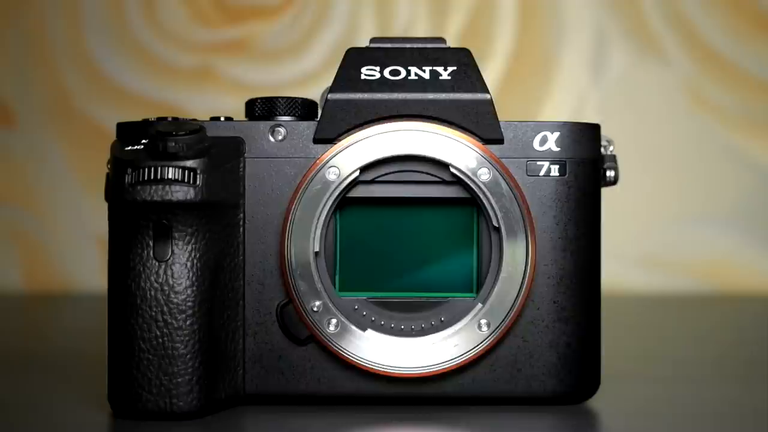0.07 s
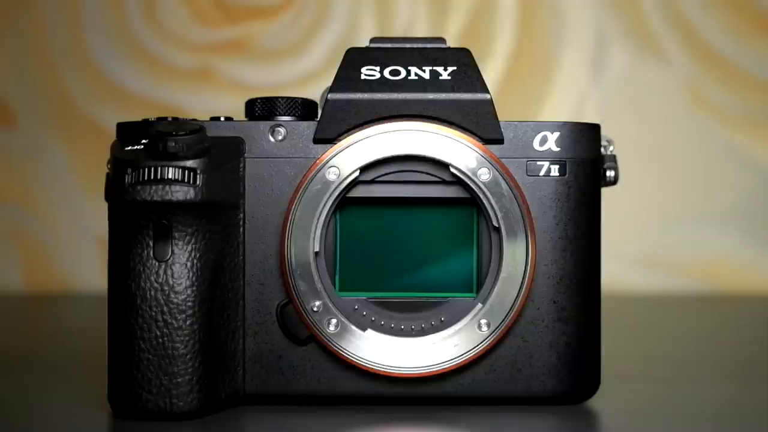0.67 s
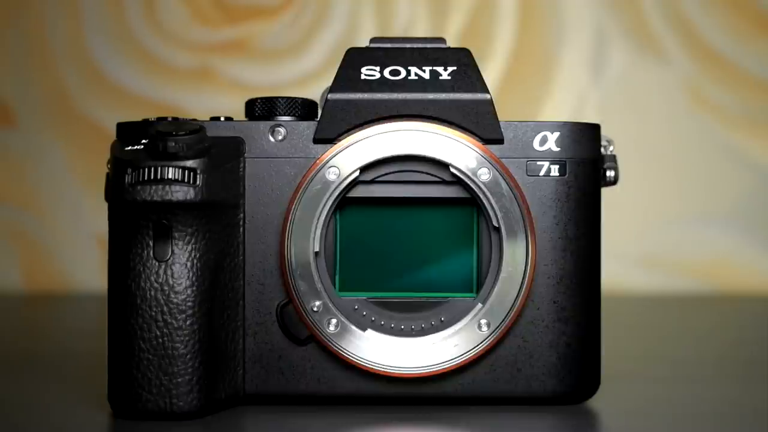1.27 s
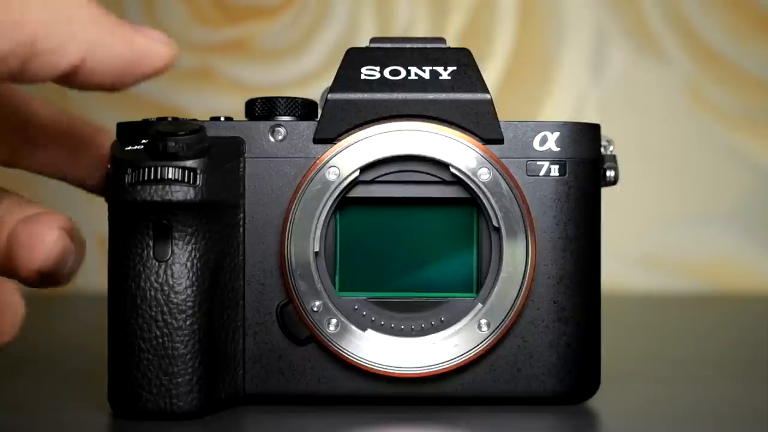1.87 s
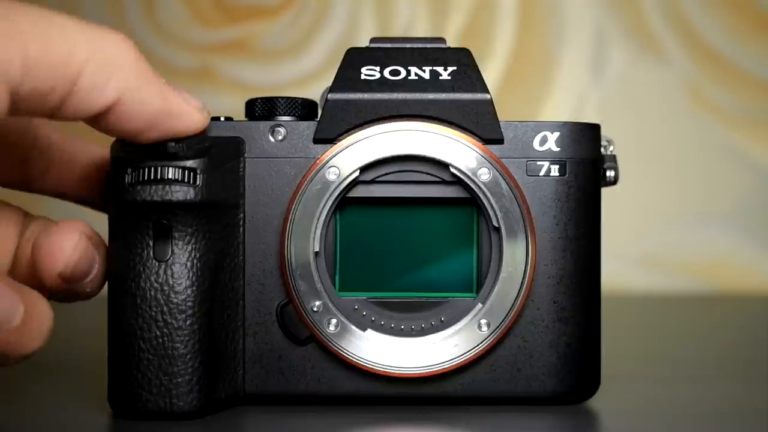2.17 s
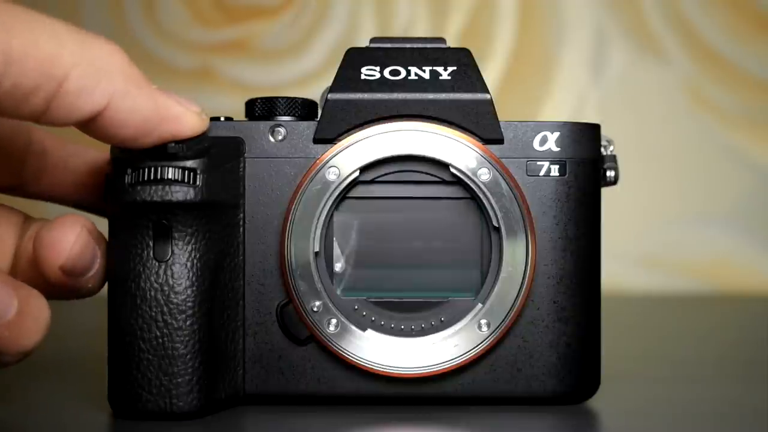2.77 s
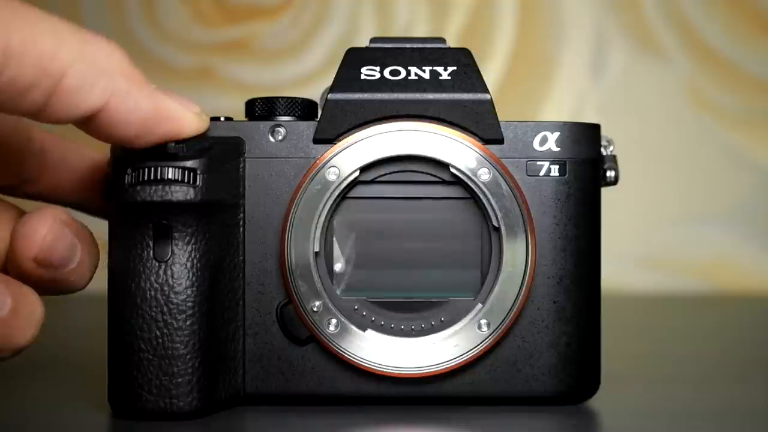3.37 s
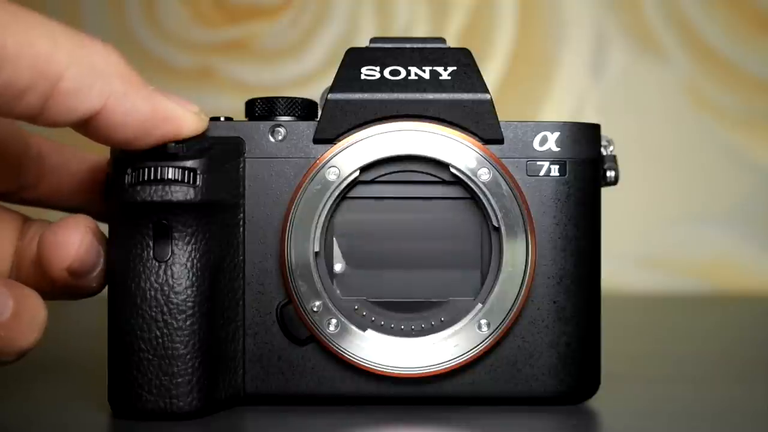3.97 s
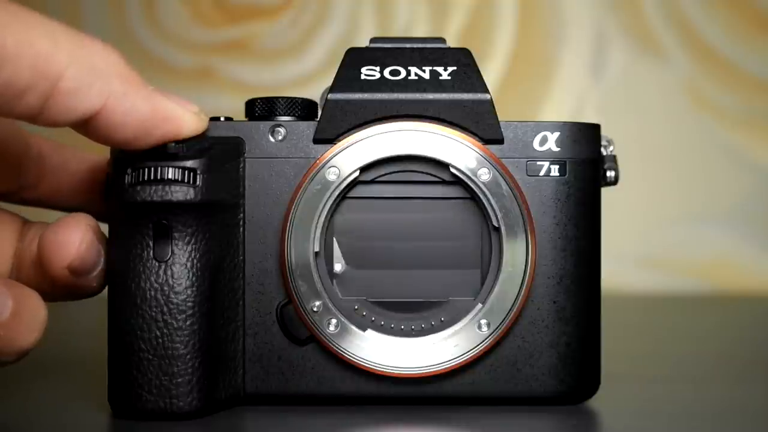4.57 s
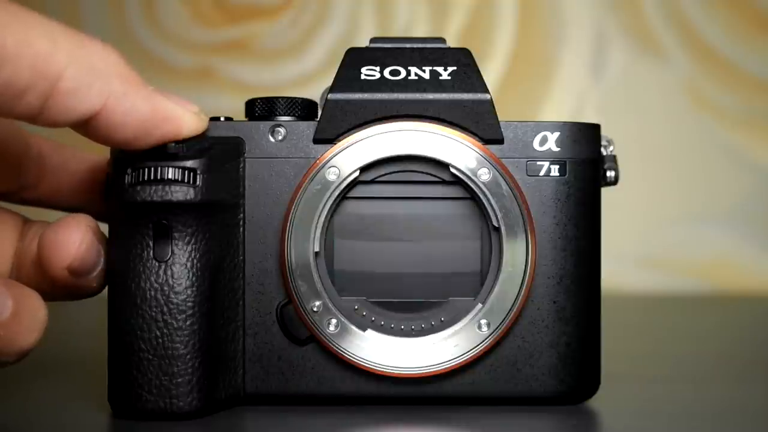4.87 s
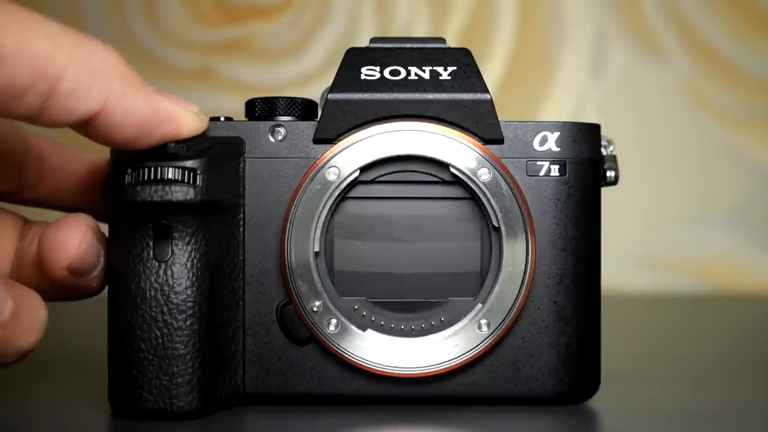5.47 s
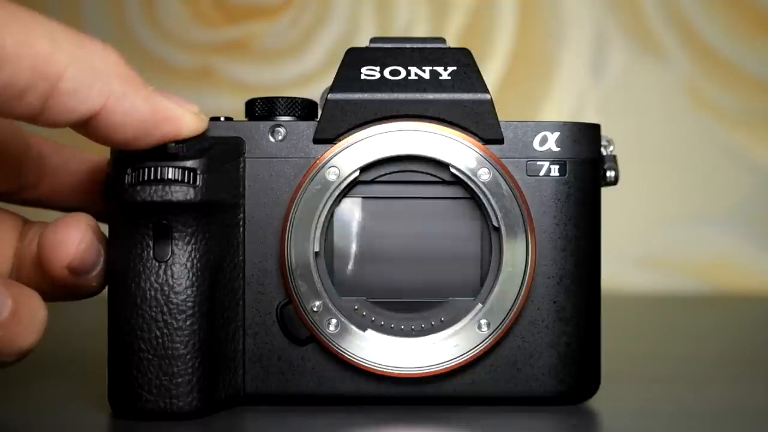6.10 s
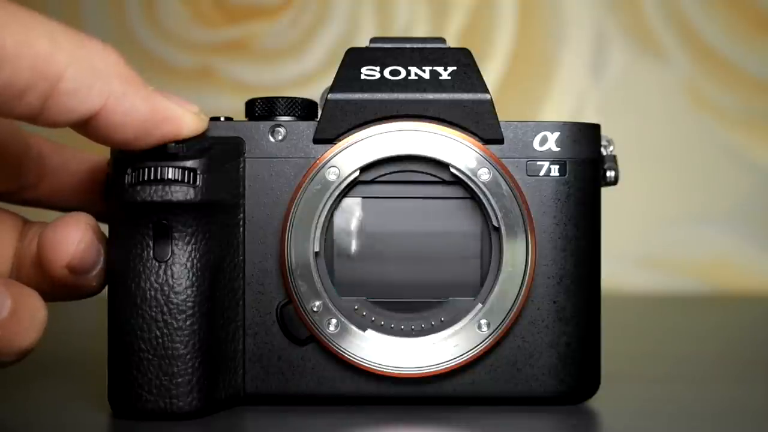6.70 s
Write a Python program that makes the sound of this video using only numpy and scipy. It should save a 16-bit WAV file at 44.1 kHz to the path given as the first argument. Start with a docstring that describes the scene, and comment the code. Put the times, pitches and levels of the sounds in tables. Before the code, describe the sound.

A camera's mechanical shutter clacks in a rapid, even burst, with a small motor whirring between the sharp clicks.

```python
"""A mirrorless camera with no lens stands on a table in a quiet, faintly humming room.
At about 2 s a finger settles on the button; then the camera fires a burst, five frames a second.
In each cycle a motor cocks the springs, one curtain snaps open, the other slams shut and the blades
swing back, all ringing through the camera and table. The microphone is close: its two sides hear
different tone colours, and the slams overload it. The burst runs on to the end."""
import sys
import numpy as np
from scipy import signal
from scipy.fft import rfft, irfft
from scipy.io import wavfile
from scipy.ndimage import uniform_filter1d

SR = 44100
rng = np.random.default_rng(int(sys.argv[2]) if len(sys.argv) > 2 else 0)


def transcribe(u):
    """Save the signal u as a 16-bit wav file named by the first command-line argument.

    u: samples, shape (n,) or (channels, n), limited to [-1, 1]; the rate is SR.
    q: integer samples, one column per channel.
    """
    v = np.clip(np.atleast_2d(u).T, -1, 1)
    q = np.round(v * 32767).astype(np.int16)
    wavfile.write(sys.argv[1], SR, q)


N = 297234
TIME = np.arange(N) / SR
MOTOR_START_S, CYCLE_S = 2.347, .201

# each slam, and the thump of the overloaded microphone: start_s, overload_db (before thump_boost_db)
SLAMS = [(2.5376, -62), (2.7393, -57), (2.9398, -63), (3.1401, -65), (3.3404, -49), (3.5428, -49),
         (3.7439, -66), (3.9449, -59), (4.1461, -49), (4.3471, -48), (4.5475, -57), (4.7489, -64),
         (4.9508, -62), (5.1545, -47), (5.3554, -55), (5.5566, -45), (5.758, -66), (5.9594, -47),
         (6.161, -56), (6.3625, -66), (6.5644, -60)]
# the first hit and its bounces: after_slam_ms, level_db
BOUNCES = [(.05, 2.5), (.32, -3), (0.521, -13)]
# tone colour of the click: pitch_hz, gain_db
CLICK_COLOUR = [(30, 3), (250, 2), (600, 0.5), (1000, 14), (1600, 17.5), (2700, 14), (4000, 6.5),
                (6000, 12.5), (9000, 16), (14000, 10)]


def curtain_slam(side_db=-8, side_lag_ms=0.12, vary_db=0.56, thump_boost_db=72):
    """The closing curtain stops dead with a hard, bouncing click; the overloaded microphone adds
    a low thump of varying strength. Gives mid and side."""
    clicks, thumps = np.zeros((2, N + SR))
    start_s, overload_db = np.transpose(SLAMS)
    for ms, db in BOUNCES:
        at = (start_s * SR + .5).astype(int) + round(ms / 1000 * SR)
        clicks[at] += from_db(db + vary_db * rng.standard_normal(len(at)))
    thumps[at] = from_db(overload_db + thump_boost_db)
    click = colour(clicks[:N], CLICK_COLOUR)
    thump = colour(thumps[:N], [(25, 5.0), (70, -2.0), (150, -18.0), (600, -53.0)])
    side = from_db(side_db) * np.interp(TIME - side_lag_ms / 1000, TIME, click)
    return np.array([click + thump, side])


# slam times, plus one cycle at each end because the burst begins and ends in mid-cycle
CYCLE_TIMES_S = [SLAMS[0][0] - CYCLE_S] + [s for s, _ in SLAMS] + [SLAMS[-1][0] + CYCLE_S]
# Parts that meet in each cycle: cocking lever, spring cam, catch, first latch, opening curtain (lands,
# rebounds, flutters), second latch, closing curtain (flutters), blades (swing back, settle).
# after_slam_ms (negative is before), rise_ms, decay_ms, thud_db, knock_db, ring_db, tick_db
CONTACTS = [ (-113.2, 0.23, 0.97, 1.5, 1, -6, -14), (-104.2, 2.9, 4.9, 2, 6.5, 4, -5),
            (-72.5, 1.4, 1.9, -9.5, -0.5, -12, -17), (-45.5, 0.45, 3.2, -2, -9, 0.5, -57),
            (-38.5, 0.82, 0.87, 8.5, -1.5, 5, 11), (-36.5, 0.6, 1.8, 2.5, -3, 9, -9),
            (-31, 5.6, 7.7, 6, -2.5, 1.5, 6), (-6, 0.17, 2.8, 1, 4, 1, -8),
            (1.14, 1.2, 1.9, -2, 2, 1.5, 5.5), (17.5, 0.23, 1.6, 1.5, 11.5, 5, 7.5),
            (20, 0.82, 2.44, -0.5, 8, -2, -1)]
# where the thud, knock, ring and tick lie: pitch_hz
CONTACT_BANDS = [640, 1100, 4000, 8500]


def contact(after_slam_ms, rise_ms, decay_ms, bands_db, sameness=.85, jitter_ms=.1, vary_db=.5):
    """Two parts knock together in nearly the same way in every cycle. Gives mid and side."""
    lead, length = 1024, 4096   # samples
    ms = (np.arange(length) - lead) / SR * 1000
    envelope = np.exp(np.minimum(ms / rise_ms, -ms / decay_ms))
    usual = chatter(envelope)
    out = np.zeros((2, N + SR))
    for cycle_s, (late, force) in zip(CYCLE_TIMES_S, rng.standard_normal((len(CYCLE_TIMES_S), 2))):
        hit_s = cycle_s + (after_slam_ms + jitter_ms * late) / 1000
        burst = np.sqrt(sameness) * usual + np.sqrt(1 - sameness) * chatter(envelope)
        if hit_s > MOTOR_START_S:
            at = round(hit_s * SR) - lead
            out[:, at:at + length] += from_db(vary_db * force) * burst
    return colour(out[:, :N], list(zip(CONTACT_BANDS, bands_db)))


def chatter(envelope):
    """Tiny impacts blur into two bursts of noise, evened out from bass to treble."""
    spectra = rfft(rng.standard_normal((2, len(envelope))) * envelope)
    power = uniform_filter1d(np.abs(spectra) ** 2, size=61, axis=-1)
    return irfft(spectra / np.sqrt(power + 1e-20))


# one whir for each load the motor takes up: after_slam_ms, length_ms, start_pitch_hz, level_db
WHIRS = [(-146, 38, 402, -39.5), (-88, 47, 338, -40.5), (-38, 28.6, 332, -38), (-12, 63.6, 242, -38)]


def motor(sag_hz_per_s=400, wobble_share=0.01698, spin_up_s=0.0095):
    """The motor whirs, slowing under each load, and drives the shaft and gears. Gives mid and side."""
    wobble = wobble_share * wander(900)
    uneven_teeth = wander(50)
    tones = glides(WHIRS, -sag_hz_per_s, wobble) + shaft_drone(wobble) + gear_whistle(uneven_teeth)
    running = np.clip((TIME - MOTOR_START_S) / spin_up_s, 0, 1)
    return (gear_rustle(uneven_teeth) + np.array([tones, np.zeros(N)])) * running


# swells of the shaft's drone: after_slam_ms, length_ms, level_db
DRONES = [(-47, 44, -46), (20, 59, -46.5)]


def shaft_drone(wobble, pitch_hz=139.7, octave_db=-3, idle_db=-57):
    """The spinning shaft drones, louder after each curtain has moved."""
    angle = phase(pitch_hz * (1 + 2 * wobble))
    effort = from_db(idle_db) + sum(from_db(db) * swell(ms, length_ms) for ms, length_ms, db in DRONES)
    return effort * (np.sin(angle) + from_db(octave_db) * np.sin(2 * angle))


# chirps of the gears: after_slam_ms, length_ms, start_pitch_hz, level_db
CHIRPS = [(-150, 46, 4700, -53), (-96, 18, 8750, -49), (-73, 24, 8750, -44), (-72, 18, 5950, -54)]


def gear_whistle(uneven_teeth, rise_hz_per_s=10000, flutter_share=0.0061):
    """Gear teeth whistle in short, rising chirps."""
    return glides(CHIRPS, rise_hz_per_s, flutter_share * uneven_teeth)


# tone colour of the rustle: pitch_hz, gain_db
RUSTLE_COLOUR = [(60, 10), (140, 9.5), (300, 20), (600, 8), (900, 8.5), (2500, 7), (4000, 6.5), (9000, 9.5),
                 (15000, 10)]


def gear_rustle(uneven_teeth, grain=0.24, base_db=-43.5, swing_db=1, peak_ms=-79):
    """Uneven teeth make a grainy rustle, loudest while the springs are cocked."""
    level_db = base_db + swing_db * np.cos(2 * np.pi * seconds_since(peak_ms) / CYCLE_S)
    grains = unit_level(np.exp(grain * uneven_teeth) * rng.standard_normal((2, N)))
    return from_db(level_db) * colour(grains, RUSTLE_COLOUR)


# the finger settles on the button: start_s, level_db
TOUCHES = [(1.976, -28), (2.012, -29)]


def finger(decay_s=0.0023):
    """Skin on the button makes faint, dull ticks. Gives mid and side."""
    envelope = sum(from_db(db) * (TIME > s) * np.exp(-np.abs(TIME - s) / decay_s) for s, db in TOUCHES)
    ticks = envelope * rng.standard_normal((2, N))
    return colour(ticks, [(500, -24), (2000, -21), (3300, -20.5), (6000, -36)])


# notes at which the camera and table ring: pitch_hz, width_hz (narrow rings longer), level_db
RESONANCES = [(139, 12, 3), (225, 22, 0), (277, 14, -3), (331, 16, 0), (470, 40, -6), (605, 25, 0),
              (649, 20, 3), (2287, 35, -7), (2638, 40, -8), (3606, 60, -9), (3772, 70, -8), (3993, 50, -7),
              (4307, 45, -10), (6574, 30, -7), (7093, 35, -6), (7350, 35, -7), (8950, 90, -8)]


def body_ring(x):
    """Every knock sets the camera and the table under it ringing."""
    out = x.copy()
    for hz, width_hz, db in RESONANCES:
        fade = np.exp(-np.pi * width_hz / SR)   # share of the ring left after one sample
        feedback = [1, -2 * fade * np.cos(2 * np.pi * hz / SR), fade ** 2]
        ring = signal.lfilter([1, 0, -1], feedback, x + 1e-18)
        out += from_db(db) * (1 - fade ** 2) / 2 * ring
    return out


def room_echo(x, fade_60_db_s=0.17, echo_db=-14, gap_s=0.0017, bass_db=-7):
    """Nearby walls add a short, blurred echo that is weak in the bass."""
    t = TIME[:SR // 2]
    tails = stereo(*rng.standard_normal((2, len(t)))) * from_db(-60 * t / fade_60_db_s) * (t > gap_s)
    tails /= np.sqrt(np.sum(tails ** 2, axis=1, keepdims=True))
    tails = colour(tails, [(350, bass_db), (1500, 0)])
    return x + from_db(echo_db) * signal.fftconvolve(x, tails, axes=1)[:, :N]


# the camera's tone colour at each side of the microphone: pitch_hz, gain_db
LEFT_COLOUR = [(30, -13), (80, -10), (140, -4.5), (420, -2), (620, -0.5), (820, -2.5), (1400, 0),
               (2900, -0.5), (3800, 7.5), (4500, 7.5), (5200, -6), (6200, -4.5), (7500, -20), (9000, -25.5),
               (11000, -26.5), (15000, -16)]
RIGHT_COLOUR = [(30, -28), (80, -8.5), (140, -4.5), (420, -2), (620, 0), (820, -1), (1400, -1),
                (2900, -0.5), (4000, -4.5), (4900, -5.5), (5700, -0.5), (7200, 2), (9000, 2.5), (11000, -5),
                (13000, -7.5), (15000, -20)]


def microphone(left, right):
    """This close to the camera, each side hears its own tone colour."""
    return np.array([colour(left, LEFT_COLOUR), colour(right, RIGHT_COLOUR)])


# tone colour of the room noise: pitch_hz, gain_db
AIR_COLOUR = [(25, -23), (62, -4.5), (100, -24), (135, -8), (180, -13), (235, -3), (320, -12), (700, -14.5),
              (1300, -21.5), (2800, -24.5), (4000, -22), (5500, -29.5), (11000, -32), (15000, -23)]
# tones in the room: pitch_hz, level_db (before hum_boost_db and the sinking)
HUMS = [(59.2, -90), (145.3, -84), (242.2, -75.5), (570.6, -82), (1007, -74.5)]


def background(air_db=-59, air_sink_db_per_s=3.5, hum_boost_db=4.5, hum_sink_db_per_s=3.0):
    """Soft room noise and a few humming tones come in quickly, then slowly sink away."""
    air = unit_level(colour(stereo(*rng.standard_normal((2, N))), AIR_COLOUR))
    air *= from_db(air_db - air_sink_db_per_s * TIME)
    hum = sum(from_db(db) * np.sqrt(2) * np.sin(2 * np.pi * (hz * TIME + rng.random())) for hz, db in HUMS)
    hum *= from_db(hum_boost_db - hum_sink_db_per_s * TIME)
    fade_in = np.clip((TIME - 0.033) / .03, .02, 1)
    return (air + hum) * fade_in


# stereo width, as the gain of the side signal: pitch_hz, gain_db
WIDTH = [(50, -3.5), (130, -15), (500, -9), (2000, -6.5), (4000, -2), (9000, -3.5)]


def stereo(mid, side):
    """Make left and right from mid (what they share) and side (how they differ)."""
    side = colour(side, WIDTH)
    return np.array([mid + side, mid - side])


def colour(x, points, size=8192):
    """Turn pitches up or down along a curve of (pitch_hz, gain_db) points."""
    hz, db = np.transpose(points)
    grid_hz = np.arange(size // 2 + 1) * SR / size
    gain = from_db(np.interp(np.log(grid_hz + 1), np.log(hz), db))
    # minimum phase: the filter never sounds before the hit
    cepstrum = irfft(np.log(gain))
    cepstrum[1:size // 2] *= 2
    cepstrum[size // 2 + 1:] = 0
    response = irfft(np.exp(rfft(cepstrum)))[:size // 2]
    filtered = signal.oaconvolve(np.atleast_2d(x), response[None], axes=1)
    return filtered[:, :x.shape[-1]].reshape(x.shape)


def glides(rows, hz_per_s, waver):
    """Short tones that swell and slide in pitch in every cycle."""
    out = np.zeros(N)
    for ms, length_ms, start_hz, db in rows:
        pitch_hz = (start_hz + hz_per_s * seconds_since(ms)) * (1 + waver)
        out += from_db(db) * swell(ms, length_ms) * np.sin(phase(pitch_hz))
    return out


def swell(start_ms, length_ms):
    """A rounded rise and fall, once in every cycle."""
    return np.sin(np.pi * np.clip(seconds_since(start_ms) * 1000 / length_ms, 0, 1))


def seconds_since(after_slam_ms):
    """Time since this point of the cycle last came round."""
    cycles = np.interp(TIME, CYCLE_TIMES_S, np.arange(len(CYCLE_TIMES_S)))
    return (cycles * CYCLE_S - after_slam_ms / 1000) % CYCLE_S


def phase(hz):
    """The angle of something that turns at a changing speed."""
    return 2 * np.pi * np.cumsum(hz) / SR


def wander(samples):
    """A random drift: noise smoothed over this many samples."""
    return unit_level(uniform_filter1d(rng.standard_normal(N), size=samples))


def unit_level(x):
    """Scale to an average (rms) level of 1."""
    return x / np.sqrt(np.mean(x ** 2) + 1e-20)


def from_db(db):
    """Decibels to gain."""
    return 10 ** (np.asarray(db) / 20)


def scene(camera_db=-2):
    """The moving parts sound through the camera's body and the room, over the quiet background."""
    contacts = sum(contact(ms, rise, decay, bands_db) for ms, rise, decay, *bands_db in CONTACTS)
    mid, side = contacts + curtain_slam() + motor() + finger()
    left, right = room_echo(body_ring(stereo(mid, side)))
    return from_db(camera_db) * microphone(left, right) + background()


def record(dry, cutoff_hz=15300):
    """The slams clip at full scale, and the highest treble is cut."""
    low_pass = signal.ellip(10, .1, 80, cutoff_hz, fs=SR, output="sos")
    return signal.sosfilt(low_pass, np.clip(dry, -1, 1))


dry = scene()
out = record(dry)
transcribe(out)
```